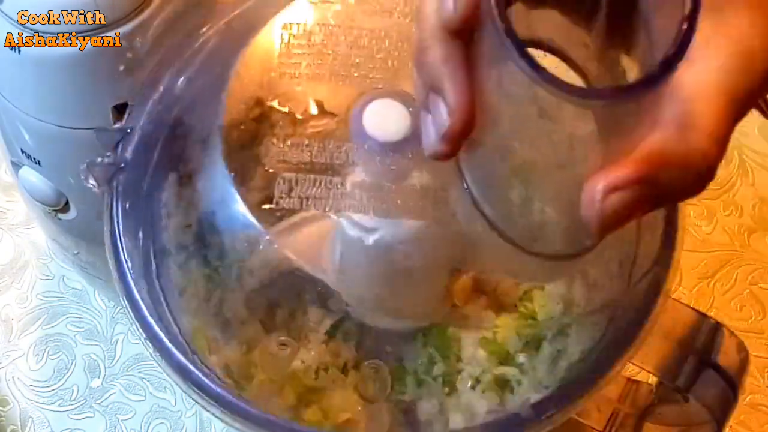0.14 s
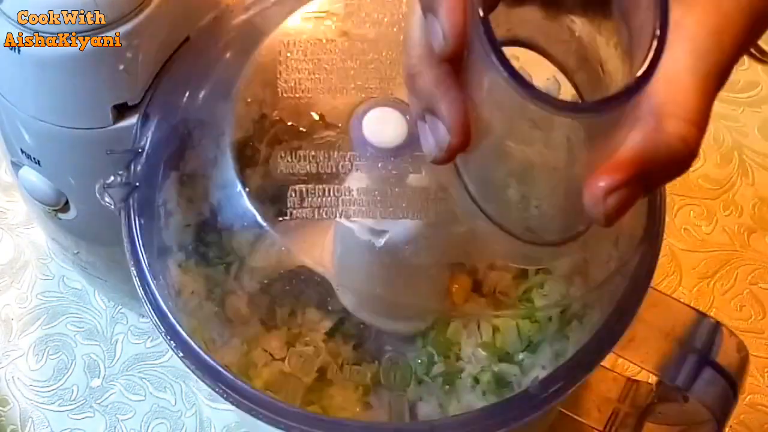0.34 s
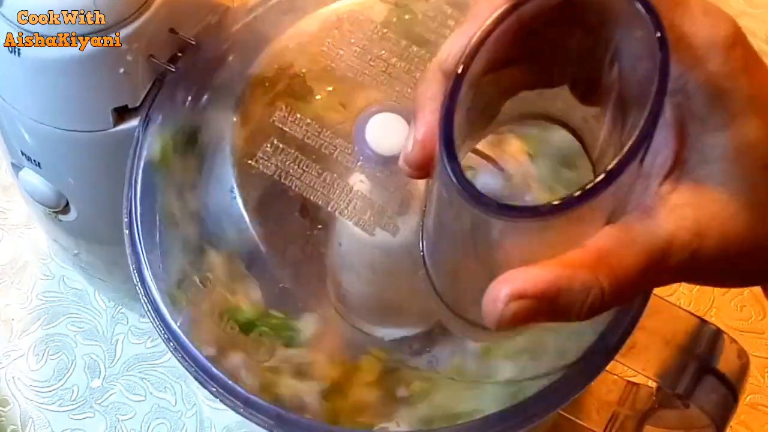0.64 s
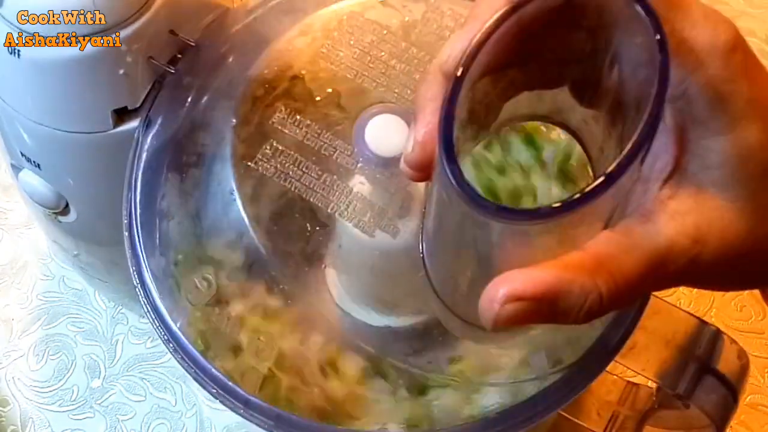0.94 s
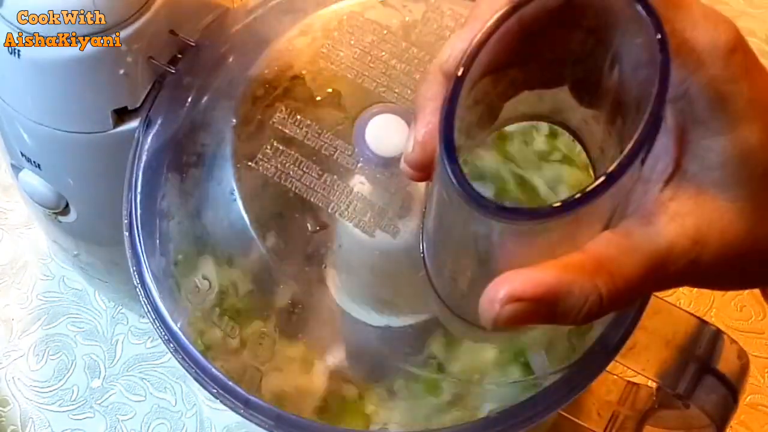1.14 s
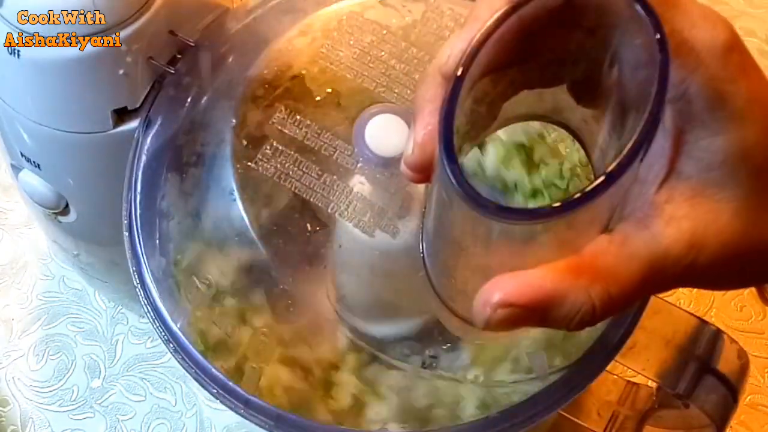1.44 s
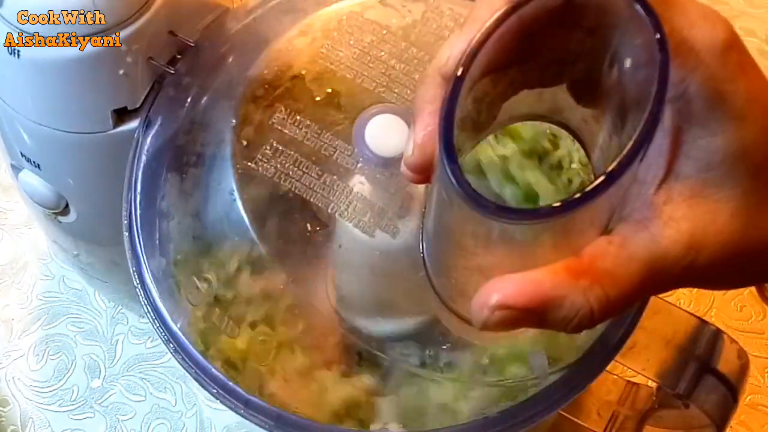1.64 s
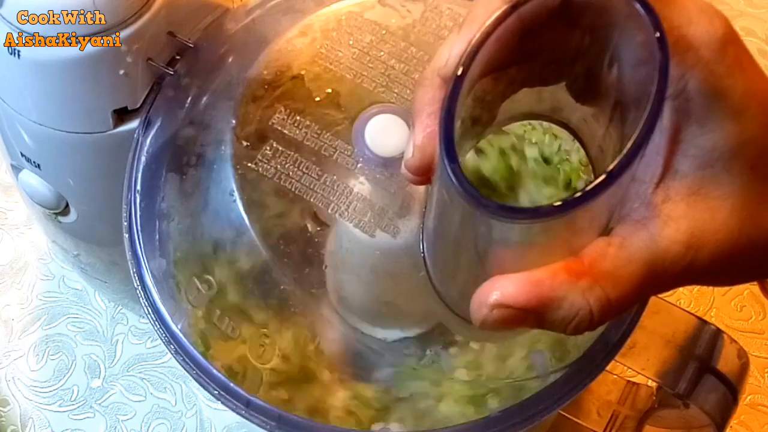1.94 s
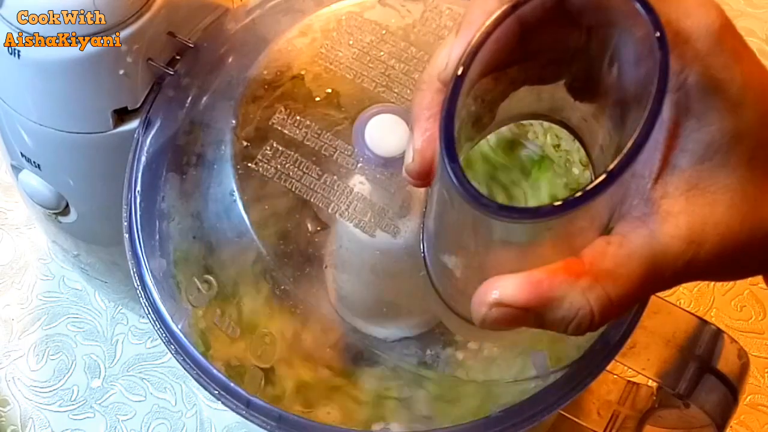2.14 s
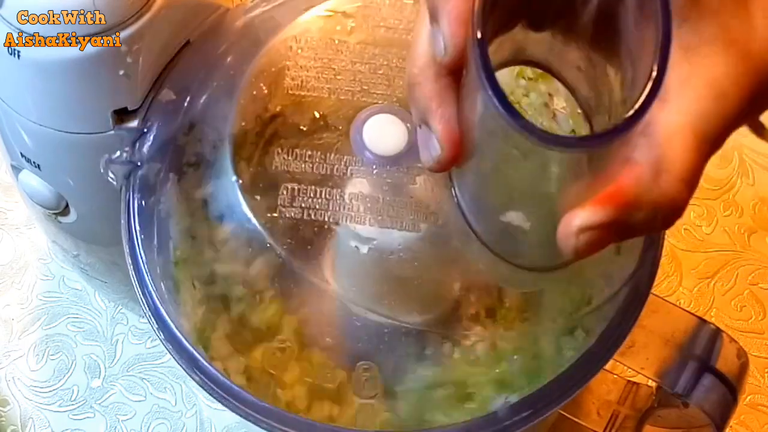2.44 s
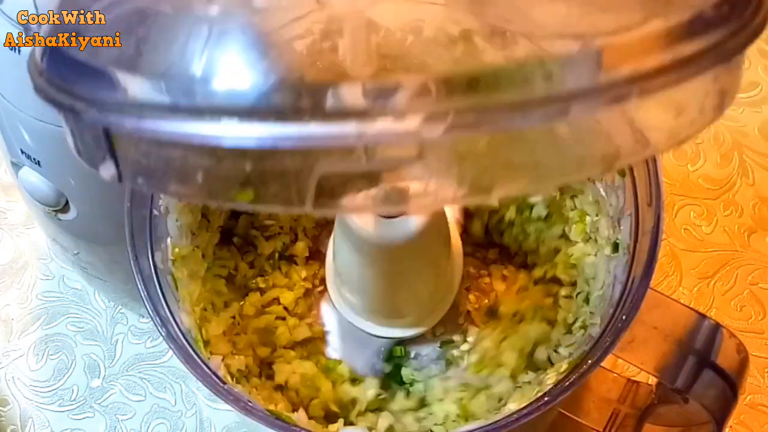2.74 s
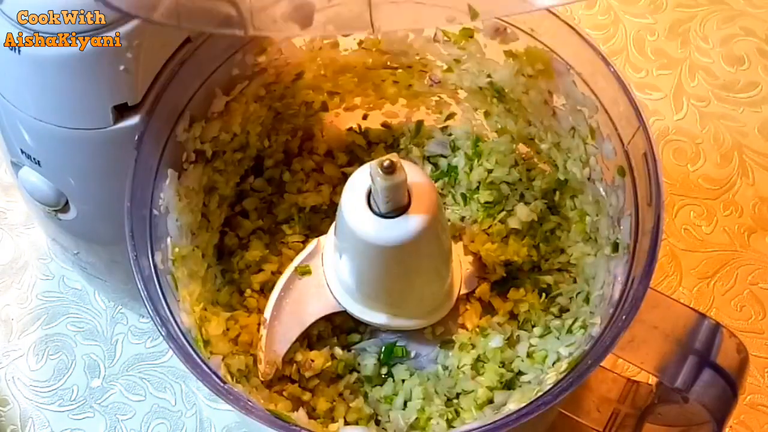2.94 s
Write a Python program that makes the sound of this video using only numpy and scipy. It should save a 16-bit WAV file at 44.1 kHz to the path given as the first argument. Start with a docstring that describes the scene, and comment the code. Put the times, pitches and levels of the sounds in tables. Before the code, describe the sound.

Food processor heard close up in stereo: its plastic lid bumps and creaks on, the motor jerks once then runs roughly, food tumbling, before it coasts down amid lid knocks and a faint blade tink.

```python
"""A food processor on a kitchen table, heard from just above the bowl over a faint room tone.
The lid knocks on as damped ringing modes, then slides and groans by stick-slip as it is twisted.
The motor kicks once, latch and coupling snap in as noise bursts, and it catches again and runs: grain noise
rasps and rings the plastic, sines hum, and food tumbles and patters as random impacts.
With the power cut it coasts down with a gear whine; the lid is bumped loose and a blade tinks."""
import sys
import numpy as np
from scipy import signal
from scipy.fft import rfft, irfft
from scipy.io import wavfile
from scipy.ndimage import uniform_filter1d

SR = 44100
rng = np.random.default_rng(int(sys.argv[2]) if len(sys.argv) > 2 else 0)


def digitize_waveform(pressure):
    """Quantize a signal to 16-bit integers and store it at the path in sys.argv[1].

    Rows of a 2-D input are taken as channels; values are limited to [-1, 1].
    """
    field = np.atleast_2d(pressure).T
    bounded = np.clip(field, -1, 1)
    quanta = np.round(bounded * 32767).astype(np.int16)
    wavfile.write(sys.argv[1], SR, quanta)


N = 136710  # samples

# Faint background spectrum: f/Hz, level/dB
QUIET_SPECTRUM = [(30, -6), (120, -1), (400, -11), (4300, -19), (5500, -43)]
# Spectrum of the wall reflections: f/Hz, level/dB
WALL_SPECTRUM = [(150, -12.0), (700, 0.0), (4000, -4.0), (9000, -11.5)]
QUIET_DB, ROOM_DB, ROOM_T60_S = -75, -10.02, .3

# Lid bumps on the bowl: t/s, thud level/dB, tick level before CONTACT_DB/dB, factor on the ring time
LID_KNOCKS = [(0.2236, -22.5, -8.5, 0.84), (.236, -22, -23, 0.88), (.257, -21.5, -20, 0.73),
              (0.2864, -20.5, -8, 1.6), (.299, -16, -20, 0.65), (.403, -21.5, -18, 0.33),
              (0.653, -18, -10.5, 0.11), (2.697, -19, -31, .25), (2.739, -17.5, -3, 0.45),
              (2.776, -12.5, -28, 0.3)]
# Lid modes: f/Hz, level/dB, t60 before the knock's factor/s
LID_MODES = [(211, -24.5, 0.17), (360.6, 3, 0.089), (368, -5, 0.1), (480, -5.5, 0.038),
             (1020, -19.5, 0.047)]
# Latch and blade coupling snapping in: t/s, level before CONTACT_DB/dB, t60/s
LATCH_SNAPS = [(0.4327, 7, 0.013), (.6995, -3.5, 0.035), (0.7095, 7.5, 0.033), (0.715, 1.5, 0.027)]
# Hard plastic contact spectrum: f/Hz, level/dB
CONTACT_SPECTRUM = [(100, -13.5), (700, -3.5), (1100, 4.5), (1700, -4.5), (2700, 0), (4200, -5.5),
                    (5500, -21.5), (8000, -46.5), (15000, -45)]
# Stick-slip groans of lid on rim: start t/s, end t/s, start f/Hz, end f/Hz, level/dB
LID_GROANS = [(0.384, 0.436, 310, 260, -29.5), (0.458, 0.544, 214.3, 188.2, -22.5)]
# Rim sliding in its groove: start t/s, end t/s, level/dB
RIM_SLIDES = [(0.4, 0.45, -46.5), (0.647, 0.685, -43.5)]
# Steel blade touched as the lid comes away: t/s, f/Hz, level/dB, t60/s
BLADE_TINK = (3.089, 3903, -52, .07)
LID_LOW_HZ, LID_HIGH_HZ = 163, 1480  # band of the thuds
TICK_T60_S, RATTLE_T60_S = 0.018, 0.2
RATTLE_DB = -13.5  # relative to the tick
SCRAPE_DB = 6  # relative to the groan tone
CONTACT_DB, LID_LEAN_DB = -7.5, 4.7  # trim of ticks and snaps; left minus right of thuds and groans

# Blade speed: t/s, rate/(blade passes per s)
BLADE_SPEED = [(.39, 1.43), (.44, 47), (.5, 52), (.55, 27), (.625, 13), (.7, 33.3), (.77, 85), (.93, 101),
               (1.12, 106.7), (2.36, 107.2), (2.52, 110), (2.68, 77.4), (2.82, 50.3), (2.94, 21.2),
               (3.03, 2.6)]
FULL_HZ = 107  # blade passes per s taken as full speed
HUM_JITTER = .024  # typical fractional wander of the pass rate

# Weight of food on the blades: t/s, level relative to TUMBLE_DB/dB
FOOD_LOAD = [(.4, 19), (.52, 5.5), (.6, 5), (.68, 13.5), (.93, 0.5), (2.33, 0.5), (2.41, -4), (2.52, 4.5),
             (2.61, -2.5), (2.68, 10.5), (2.87, 1.5), (3.08, 19)]
# Tumbling food spectrum: f/Hz, level/dB
TUMBLE_SPECTRUM = [(50, -17.5), (100, -3.5), (165, 1.5), (230, -2), (330, -4), (480, -8.5), (750, -24.5),
                   (5000, -89.5)]
# Pattering food spectrum: f/Hz, level/dB
PATTER_SPECTRUM = [(600, -25.5), (2200, 4), (4100, 2.5), (5200, -12), (8000, -29), (15000, -33.5)]
TUMBLE_DB, PATTER_DB = -30, -34  # before load and speed act
TUMBLE_LAW, PATTER_LAW = 1.6, 6.9  # amplitude goes as speed to this power
BASS_LEAN_DB, BASS_LIKENESS = 4.5, 0.99  # left minus right; channel correlation
PIECES_PER_S, PIECE_DB, PIECE_T60_S = 220, -35.5, .011  # hit rate at full speed
PIECE_LOW_HZ, PIECE_HIGH_HZ = 1400, 4200

# Blade hum at 1, 2, 3 and 4 times the pass rate, before swell and speed: level/dB
HUM_LEVELS = [-44.5, -34, -36.5, -45.5]
# Swell of the second hum tone as the blades bite: t/s, level/dB
BITE_SWELL = [(.45, 0), (.62, -17), (.8, 15.5), (.85, 5), (.935, 13.5), (1.0, 4.5), (1.4, -3.5), (1.72, 2),
              (1.95, -3.5), (2.6, -3), (2.67, 8), (2.76, -2)]
HUM_LAW, HUM_FLUTTER_DB = 2.94, 3.5

MESH_ORDER = 16  # gear teeth per blade pass
MESH_HZ, MESH_WIDTH_HZ, MESH_DB = 1150, 260, -41  # resonance that the falling mesh tone crosses

# Motor under power, and at .699 a short bright clack as the coupling slams in:
# start t/s, end t/s, level relative to MOTOR_DB/dB
RASP_BURSTS = [(.436, .515, -3), (.699, .705, 1), (.735, 2.39, 0)]
# Motor rasp spectrum: f/Hz, level/dB
MOTOR_SPECTRUM = [(650, -25), (950, -12), (1600, -7), (3100, -3), (4150, -6.5), (4700, -19.5),
                  (7100, -27.5), (8000, -43), (15000, -54)]
# Gear chatter spectrum: f/Hz, level/dB
GEAR_SPECTRUM = [(700, -31), (1000, -8), (2000, -3.5), (2600, -9), (3600, -3.5), (4450, -7.5), (5200, -25),
                 (7000, -27.5), (8500, -38.5), (15000, -46.5)]
# Lean of the motor and gear noise: f/Hz, left minus right level/dB
MACHINE_LEAN = [(500, 6.5), (950, 3.5), (2200, 2.5), (4000, -8), (5000, -2), (7000, 4), (14000, 19)]
# Plastic housing resonances: f/Hz, width/Hz, level/dB, left minus right level/dB
HOUSING_MODES = [(950, 120, -5, 4), (1094, 65, -10, 4), (1480, 100, -5, 2), (1795, 50, -9, 4),
                 (2005, 90, 0, 0), (2195, 80, -1, 2), (3480, 220, -3, -2)]
# Housing ring at full speed; slack gears knock harder once the power is cut: t/s, level/dB
HOUSING_SWELL = [(.75, -27.5), (1.2, -33), (2.36, -29.5), (2.41, -39), (2.45, -28), (2.8, -28),
                 (3.0, -27.5)]
# Motor casing resonances that sing near full speed: f/Hz, width/Hz, level/dB, left minus right level/dB
CASING_MODES = [(2618, 65, -2, -7), (2848, 70, 1, -9), (3712, 45, -8, -6)]
# Casing ring at full speed: t/s, level/dB
CASING_SWELL = [(.85, -27.5), (1.2, -27.5), (1.5, -26), (1.8, -26.5), (2.45, -33.5)]
RASP_ATTACK_S, RASP_RELEASE_S = .003, .009  # linear rise; exponential fall time constant
MOTOR_DB, GEAR_DB = -27.5, -28.5  # before the rasp envelope and speed act
GEAR_LAW, HOUSING_LAW, CASING_LAW = 1.57, 1.71, 4
THROB_DB, FLUTTER_DB = 0.66, 1.3  # swing once every two blade passes; irregular flutter
TREBLE_LIKENESS = 0.19
DULL_HZ, HISS_LAW = 4800, 0.87  # above this pitch the hiss goes as speed to this power

PEAK_LIMIT, TOP_HZ = .6, 15250


def undb(db):
    """Decibels to gain."""
    return 10 ** (np.asarray(db) / 20)


def unit(x):
    """Scale to rms 1."""
    return x / np.sqrt(np.mean(x ** 2) + 1e-18)


def clock():
    """Time of every sample in seconds."""
    return np.arange(N) / SR


def curve(rows):
    """Join (t, value) points by straight lines."""
    return np.interp(clock(), *np.array(rows).T)


def walk(rate):
    """Smoothed random wander with rms near 1, from this many new values per second."""
    hold = int(SR / rate)
    steps = np.repeat(rng.standard_normal(N // hold + 1), hold)
    return unit(uniform_filter1d(steps, hold)[:N])


def pan(lean_db):
    """Left and right gains that differ by lean_db."""
    return undb(np.array([[lean_db], [-lean_db]]) / 2)


def ring(x, response):
    """Pass a sound through an impulse response."""
    return signal.fftconvolve(np.atleast_2d(x), np.atleast_2d(response), axes=1)[:, :N]


def colour(x, points, size=4096):
    """Shape a sound with a causal minimum-phase filter through (Hz, dB) points."""
    hz, db = np.array(points).T
    grid = np.maximum(np.fft.rfftfreq(size, 1 / SR), 1)
    gain = undb(np.interp(np.log(grid), np.log(hz), db))
    cepstrum = irfft(np.log(gain))
    # fold the cepstrum forward in time to make the filter causal
    cepstrum[1:size // 2] *= 2
    cepstrum[size // 2 + 1:] = 0
    return ring(x, irfft(np.exp(rfft(cepstrum))))


def pair(two, likeness):
    """Blend two unrelated sounds into channels with this correlation."""
    c = np.clip(likeness, -1, 1)
    middle = np.sqrt(1 + c) * two[0]
    sides = np.sqrt(1 - c) * two[1] * np.array([[1], [-1]])
    return (middle + sides) / np.sqrt(2)


def stereo_noise(likeness):
    """White noise with this correlation between the channels."""
    return pair(rng.standard_normal((2, N)), likeness)


def grains(rate, spread_db, likeness):
    """Tiny impacts at random times, with random sign and uneven size, in stereo."""
    hit = rng.random((2, N)) < rate / SR
    size = undb(spread_db * np.minimum(rng.standard_normal((2, N)), 2))
    sign = rng.choice([-1, 1], (2, N))
    return pair(hit * size * sign, likeness)


def fade(start, t60):
    """Sudden start and exponential decay by 60 dB in t60 seconds."""
    age = clock() - start
    return (age >= 0) * np.exp(-np.log(1000) * np.maximum(age, 0) / t60)


def resonate(x, rows):
    """Excite a table of damped resonances, each leaning its own way."""
    t = clock()[:SR // 8]
    total = 0
    for hz, width, db, lean in rows:
        response = np.exp(-np.pi * width * t) * np.sin(2 * np.pi * hz * t)
        total = total + undb(db) * pan(lean) * unit(ring(x, response))
    return unit(total)


def background():
    """Steady faint noise of the kitchen."""
    return undb(QUIET_DB) * unit(colour(stereo_noise(0.24), QUIET_SPECTRUM))


def room(near):
    """Walls return a dense, decaying wash of reflections, modelled as fading noise."""
    walls = colour(rng.standard_normal((2, N)) * fade(.005, ROOM_T60_S), WALL_SPECTRUM)
    return undb(ROOM_DB) * ring(near, unit(walls) / np.sqrt(N))


def tink(start, hz, db, t60):
    """One light touch on steel rings a single damped mode."""
    return undb(db) * fade(start, t60) * np.sin(2 * np.pi * hz * (clock() - start))


def slide(start, end, db):
    """Gritty rubbing of the rim, made of random small impacts."""
    t = clock()
    return undb(db) * (t > start) * (t < end) * unit(colour(grains(2500, 2, .5), MOTOR_SPECTRUM))


def groan(start, end, from_hz, to_hz, db):
    """Plastic slips on plastic at a sagging, unsteady rate; each slip scrapes."""
    part = np.clip((clock() - start) / (end - start), 0, 1)
    rate = (from_hz + (to_hz - from_hz) * part) * (1 + walk(250) / 10)
    slips = np.cumsum(rate) / SR
    slip_decay = np.exp(-(slips % 1) / .5)
    scrape = colour(slip_decay * stereo_noise(.4), CONTACT_SPECTRUM)
    swell = np.sin(np.pi * part)
    return undb(db) * swell * (np.sin(2 * np.pi * slips) + undb(SCRAPE_DB) * scrape)


def crack(start, t60):
    """A decaying noise burst of hard plastic contact."""
    return fade(start, t60) * stereo_noise(0.16)


def thud(start, ring_factor):
    """One blow rings the lid's modes, neighbours in opposite directions."""
    total = 0
    for k, (hz, db, t60) in enumerate(LID_MODES):
        mode = fade(start, t60 * ring_factor) * np.sin(2 * np.pi * hz * (clock() - start))
        total = total + (-1) ** k * undb(db) * mode
    return total


def lid():
    """The lid thuds, ticks and rattles, slides and groans on the rim; latch and coupling snap in."""
    thuds = sum(undb(db) * thud(start, factor) for start, db, _, factor in LID_KNOCKS)
    band = signal.butter(3, [LID_LOW_HZ, LID_HIGH_HZ], "band", fs=SR, output="sos")
    thuds = signal.sosfilt(band, thuds)
    ticks = 0
    for start, _, db, _ in LID_KNOCKS:
        rattle = undb(RATTLE_DB) * crack(start, RATTLE_T60_S)
        ticks = ticks + undb(db) * (crack(start, TICK_T60_S) + rattle)
    snaps = sum(undb(db) * crack(start, t60) for start, db, t60 in LATCH_SNAPS)
    contact = undb(CONTACT_DB) * colour(ticks + snaps, CONTACT_SPECTRUM)
    groans = sum(groan(*row) for row in LID_GROANS)
    slides = sum(slide(*row) for row in RIM_SLIDES)
    return pan(LID_LEAN_DB) * (thuds + groans) + contact + slides + tink(*BLADE_TINK)


def pieces(speed):
    """Single hard pieces are flung at the wall, each with its own pitch, strength and side."""
    out, age = np.zeros((2, N + SR)), clock()[:SR // 20]
    decay = np.exp(-np.log(1000) * age / PIECE_T60_S)
    for when, keep, pitch, size, side in rng.random((int(PIECES_PER_S * N / SR), 5)):
        i = int(when * N)
        hz = PIECE_LOW_HZ * (PIECE_HIGH_HZ / PIECE_LOW_HZ) ** pitch
        click = decay * (np.sin(2 * np.pi * hz * age) + rng.standard_normal(len(age)))
        # a slower bowl throws fewer and softer pieces
        strength = (keep < speed[i]) * speed[i] ** 2 * undb(10 * size)
        out[:, i:i + len(age)] += strength * pan(10 * (side - .5)) * click
    return undb(PIECE_DB) * unit(colour(out[:, :N], MOTOR_SPECTRUM))


def food(speed):
    """Chopped food thumps round the bowl as low impacts and patters on its wall as brighter ones."""
    tumble = unit(colour(grains(900, 1.9, BASS_LIKENESS), TUMBLE_SPECTRUM))
    tumble = undb(TUMBLE_DB + curve(FOOD_LOAD)) * tumble * speed ** TUMBLE_LAW
    patter = undb(PATTER_DB) * unit(colour(grains(200 * speed, 2.1, 0.3), PATTER_SPECTRUM))
    return pan(BASS_LEAN_DB) * tumble + patter * speed ** PATTER_LAW


def blades(speed, passes):
    """Blades ploughing the food hum unevenly at multiples of their pass rate."""
    tones = []
    for k, db in enumerate(HUM_LEVELS, 1):
        flutter = undb(HUM_FLUTTER_DB * walk(30))
        tones.append(undb(db) * unit(flutter * np.sin(2 * np.pi * k * passes)))
    hum = tones[0] + undb(curve(BITE_SWELL)) * tones[1] + sum(tones[2:])
    return pan(BASS_LEAN_DB) * hum * speed ** HUM_LAW


def whine(hz, passes):
    """With the power cut, the gear mesh sings downward through a resonance."""
    resonance = np.exp(-((MESH_ORDER * hz - MESH_HZ) / MESH_WIDTH_HZ) ** 2)
    unpowered = clock() > RASP_BURSTS[-1][1]
    tone = unit(np.sin(2 * np.pi * MESH_ORDER * passes + 2 * walk(300)))
    return undb(MESH_DB) * resonance * unpowered * tone


def dull(x, speed):
    """The top of the hiss grows with speed."""
    low = signal.sosfiltfilt(signal.butter(10, DULL_HZ, fs=SR, output="sos"), x)
    return low + (x - low) * speed ** HISS_LAW


def rasp_envelope():
    """Level of the motor runs and the coupling clack: quick rise at each row's start, then a fall."""
    t, level = clock(), 0
    for start, end, db in RASP_BURSTS:
        rise = np.clip((t - start) / RASP_ATTACK_S, 0, 1)
        level = level + undb(db) * rise * np.exp(-np.maximum(t - end, 0) / RASP_RELEASE_S)
    return level


def drive(speed, passes):
    """Brushes rasp, the coupling clacks; gear teeth chatter with speed, throb and ring housing and casing."""
    throb = undb(THROB_DB * np.sin(np.pi * passes) + FLUTTER_DB * walk(70))
    motor = unit(colour(throb * grains(4000, 6.2, TREBLE_LIKENESS), MOTOR_SPECTRUM))
    motor = undb(MOTOR_DB) * rasp_envelope() * motor
    gears = unit(colour(throb * grains(3500, 1.5, TREBLE_LIKENESS), GEAR_SPECTRUM))
    gears = undb(GEAR_DB) * speed ** GEAR_LAW * gears
    left, right = dull(motor + gears, speed)
    left = colour(left, [(f, db / 2) for f, db in MACHINE_LEAN])
    right = colour(right, [(f, -db / 2) for f, db in MACHINE_LEAN])
    rasp = np.vstack([left, right])
    housing = resonate(throb * grains(3000, 1.94, 0.17), HOUSING_MODES)
    housing = undb(curve(HOUSING_SWELL)) * speed ** HOUSING_LAW * housing
    casing = resonate(throb * grains(3000, 3, 0.099), CASING_MODES)
    casing = undb(curve(CASING_SWELL) + walk(20)) * speed ** CASING_LAW * casing
    return rasp + housing + casing


def scene():
    """Lid, food and machine in a small kitchen with a faint background."""
    hz = np.maximum(curve(BLADE_SPEED), 0)
    speed = hz / FULL_HZ
    passes = np.cumsum(hz * (1 + HUM_JITTER * walk(45))) / SR  # running count of blade passes
    near = lid() + pieces(speed) + food(speed) + blades(speed, passes)
    near = near + whine(hz, passes) + drive(speed, passes)
    return background() + room(near) + near


def record(dry):
    """Round the loudest peaks softly, then cut the top steeply."""
    soft = dry / (1 + (dry / PEAK_LIMIT) ** 6) ** (1 / 6)
    return signal.sosfilt(signal.ellip(10, .2, 80, TOP_HZ, fs=SR, output="sos"), soft)


dry = scene()
out = record(dry)
digitize_waveform(out)
```